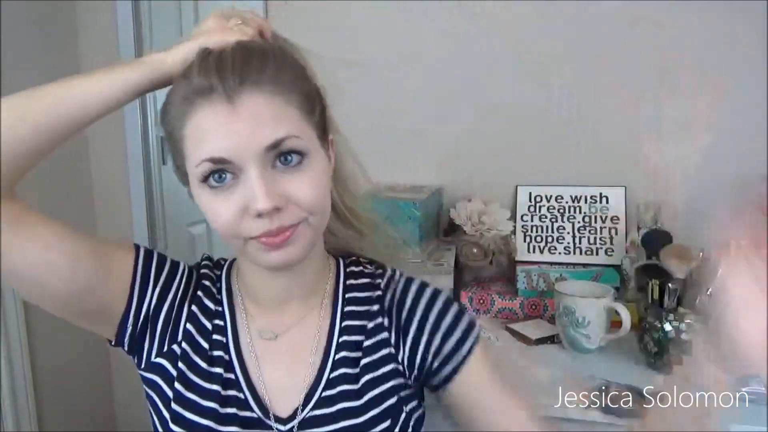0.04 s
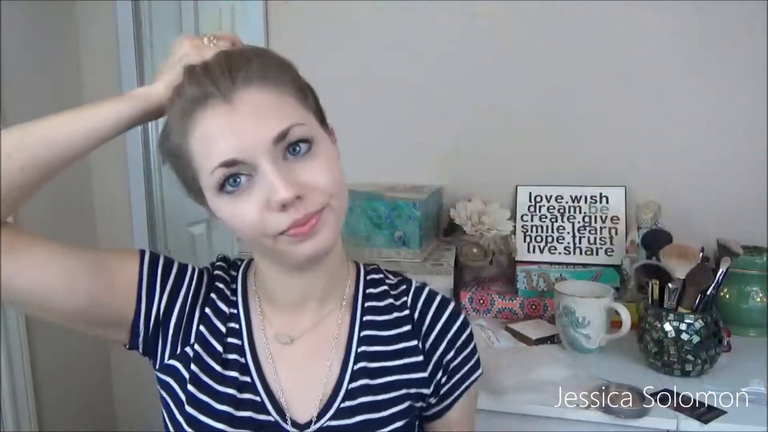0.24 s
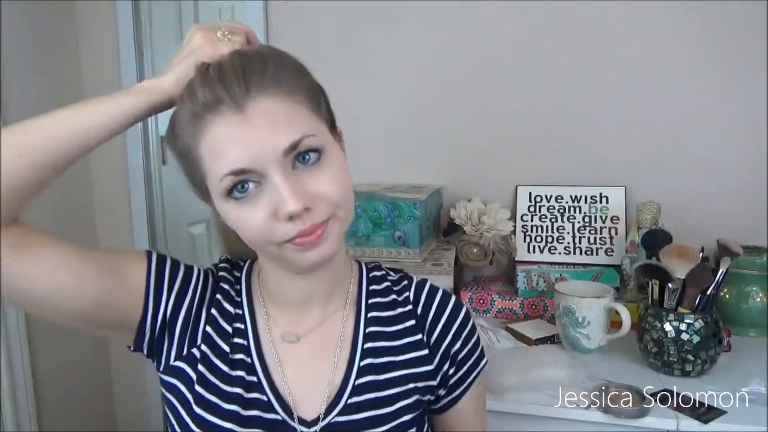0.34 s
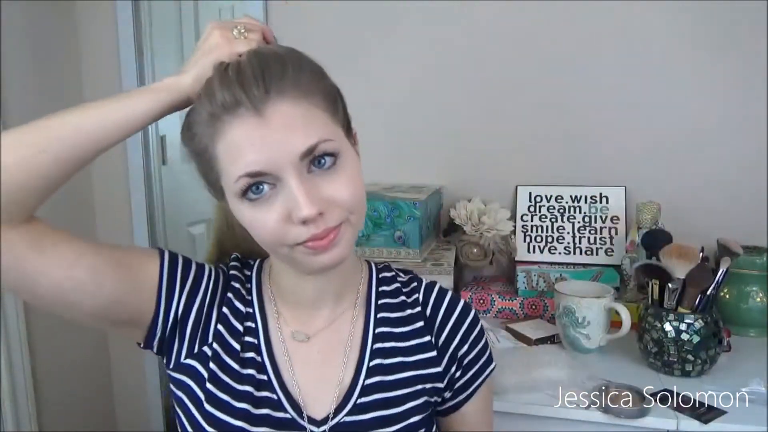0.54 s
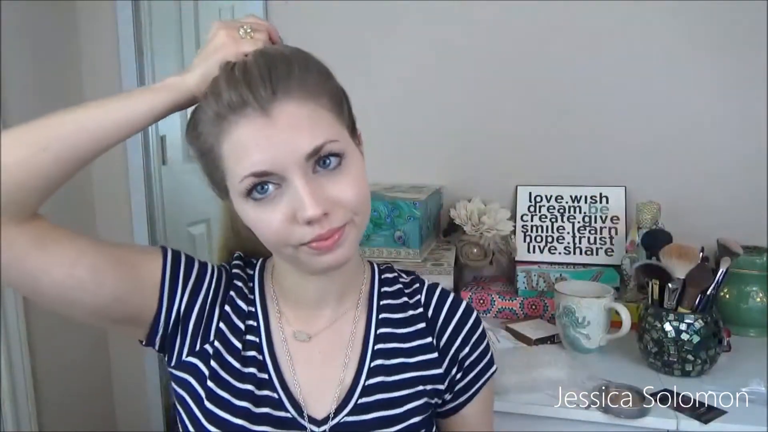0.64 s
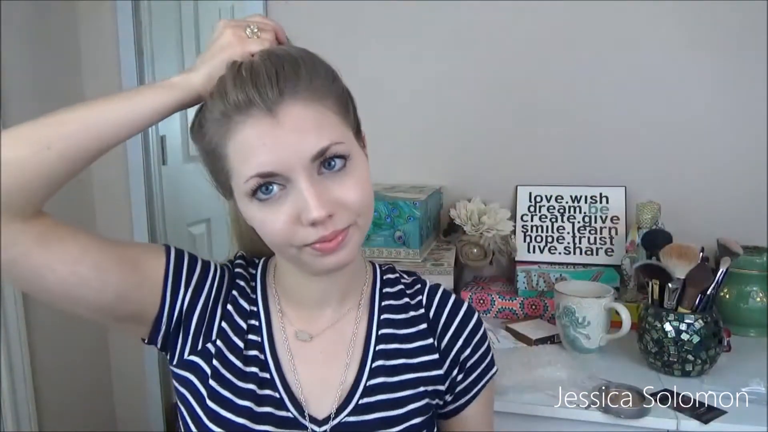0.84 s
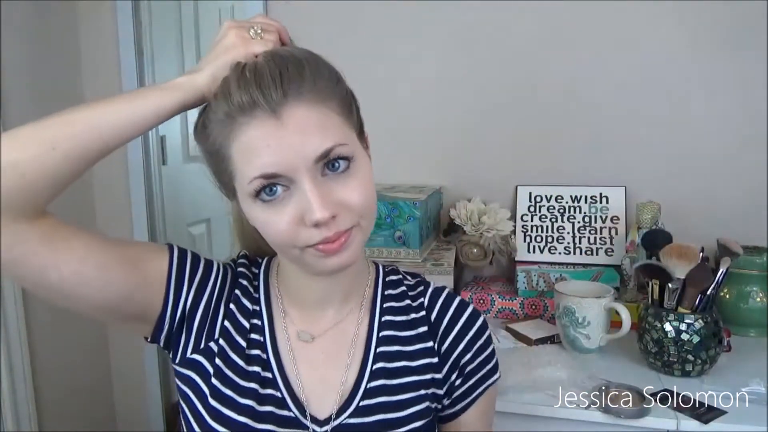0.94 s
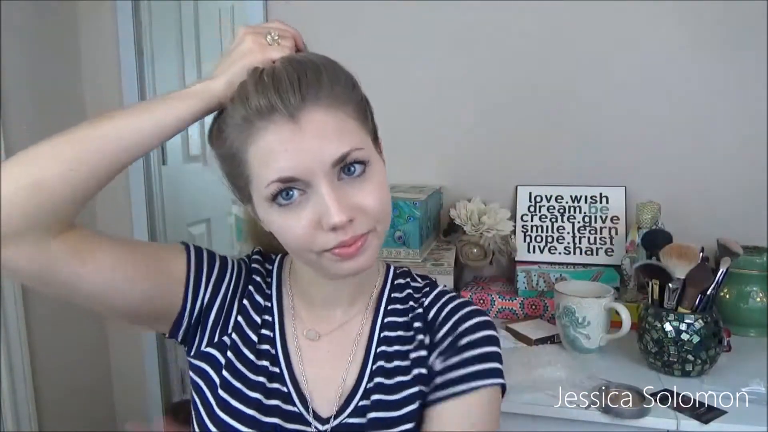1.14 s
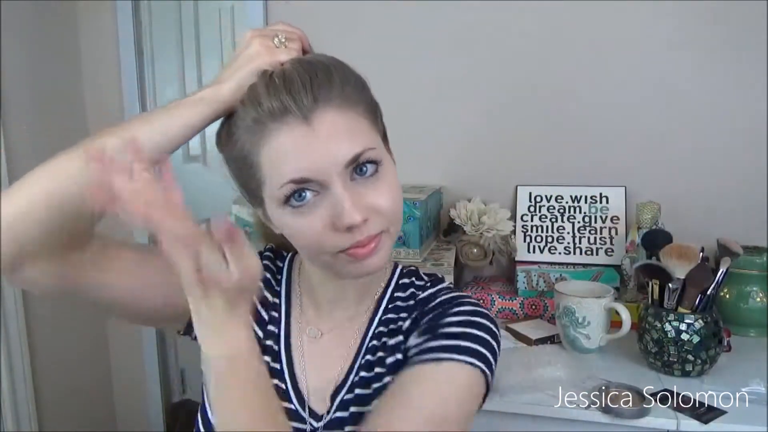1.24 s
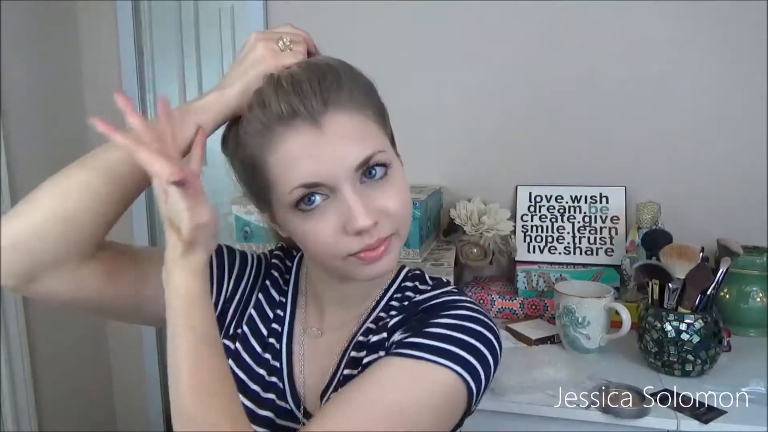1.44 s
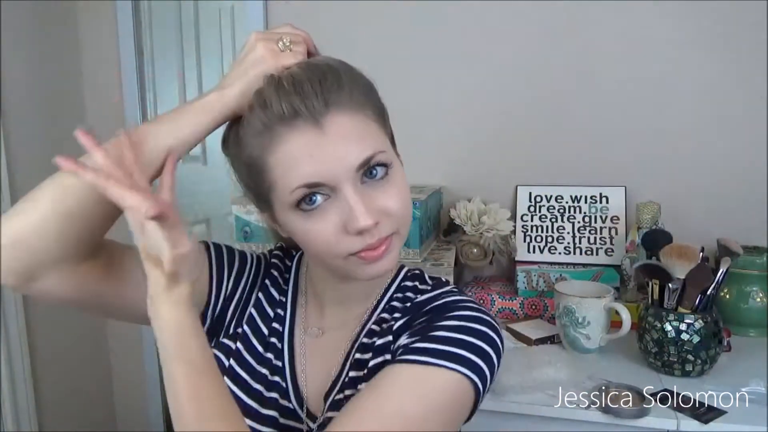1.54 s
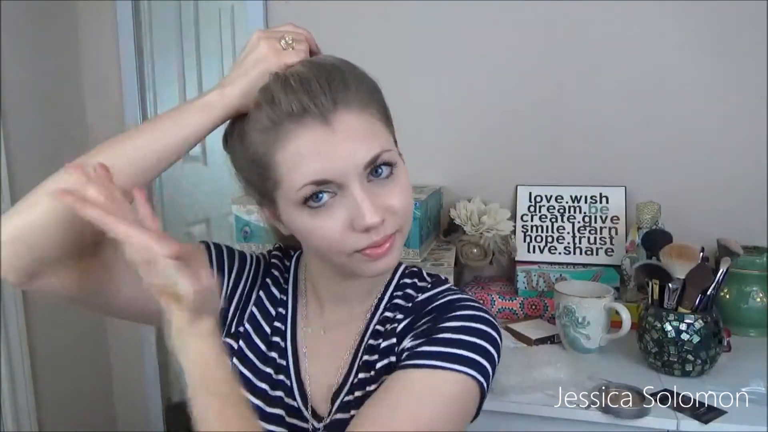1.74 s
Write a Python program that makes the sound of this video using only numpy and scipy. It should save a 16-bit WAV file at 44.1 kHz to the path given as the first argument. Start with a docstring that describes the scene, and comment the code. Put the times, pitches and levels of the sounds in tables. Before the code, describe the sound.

An elastic hair tie snaps once on a wrist at about 0.2 seconds, sharp and close, dying quickly in a small room. Much softer swishes of hair through a hand come at the start, around 0.3 to 0.5 seconds, most clearly near 1 second, then fade by 1.4. Faint, rapid, high electrical chirping, a low fan hum and room air continue underneath throughout.

```python
"""A soft swish of hair through a hand, then an elastic hair tie slips off the fingers and snaps on the wrist.
The snap is four quick blows that ring elastic and skin, over a dull push of flesh, in a small quiet room.
More swishes follow, grainy where the strands catch. Beneath: faint electrical chirping from a camera,
once per picture, plus room air, a fan hum and a brief low tone."""
import sys
import numpy as np
from scipy import signal
from scipy.fft import rfft, irfft
from scipy.io import wavfile

SR = 44100
rng = np.random.default_rng(int(sys.argv[2]) if len(sys.argv) > 2 else 0)


def master(y):
    """Save y as 16-bit WAV."""
    cut = np.clip(np.atleast_2d(y).T, -1, 1)
    pcm = np.round(cut * 32767)  # scale
    wavfile.write(sys.argv[1], SR, pcm.astype(np.int16))


N = 79380

# elastic landing (time [s], level [dB], contact time [s], direction [1 strikes, -1 springs away])
BLOWS = [(0.2069, -28, .00015, -1), (0.2082, -21, .00006, 1), (0.2087, -20, .00012, 1),
         (0.2098, -22, .00003, -1)]
# modes of elastic and skin (frequency [Hz], gain [dB], t60 [s])
RING_MODES = [(232, -21, 0.0089), (427, -25, 0.012), (688, -10.5, 0.018), (1484, -2.5, 0.0089),
              (2080, -17, 0.0065), (2910, -4, 0.0049), (3380, -6.5, 0.0052), (3850, -7, 0.0057),
              (5000, -6.5, 0.0035), (8500, -3.5, 0.0039), (9280, -5, 0.0049)]
# desk and near wall (delay [s], gain [dB])
ECHOES = [(.0046, -5.5), (.0058, -4.5)]
# room decay (frequency [Hz], t60 [s])
ROOM_T60 = [(130, 0.37), (400, 0.26), (1040, 0.25), (2760, 0.25), (7280, 0.2055)]
# hand along hair (peak time [s], rise sigma [s], fall sigma [s], hiss [dB], body [dB])
STROKES = [(0.04, 0.13, 0.27, -66.5, -72), (0.295, 0.039, 0.067, -60.5, -75),
           (0.465, 0.033, 0.027, -68.5, -70), (0.955, 0.016, 0.028, -54.5, -64.5),
           (0.985, 0.016, 0.02, -57, -60.5), (1.16, 0.056, 0.064, -66, -63.5), (1.27, .05, 0.1, -71.5, -76)]
# course of the chirping (time [s], pitch [Hz], chirp level [dB], tick level [dB])
CHIRP_TRACK = [(0.0, 2700, -61, -66), (0.131, 2636, -61.5, -91), (0.2, 2590, -65, -55),
               (0.289, 3370, -64.5, -60), (0.5, 3270, -68, -60), (0.93, 3374, -69.5, -64.5),
               (0.999, 2470, -64, -68), (1.19, 2415, -66.5, -71), (1.26, 2663, -62.5, -73),
               (1.63, 2632, -61, -80), (1.7, 2690, -69, -72), (1.76, 2690, -64, -66)]
# fan partials (frequency [Hz], rms level [dB])
FAN_PARTIALS = [(102.3, -72.5), (242.2, -82.5), (436.0, -82), (936.7, -83.5)]
# noise spectra (frequency [Hz], relative level [dB])
CRACK_SPECTRUM = [(300, -30), (1000, 2), (2500, 10), (4500, 1.5), (7000, -7), (9000, 0.5), (11500, -20)]
SLIP_SPECTRUM = [(100, 13), (400, -11), (1400, 8.5), (2500, 0), (5000, -8), (7000, -2), (9500, 9),
                 (11500, -26)]
ROOM_SPECTRUM = [(50, -26), (125, -3), (200, -1.5), (310, 2), (620, 3.5), (800, -3.5), (1100, 1), (1520, 0),
                 (2200, -6.5), (3500, -4), (4300, -8.5), (6300, -14.5), (8000, -13), (9500, -10.5),
                 (11000, -20.5)]
HAIR_HISS_SPECTRUM = [(1000, -35), (3500, -18), (4400, -8.5), (5700, -6.5), (7200, -7), (8400, -0.5),
                      (9500, 0.5), (10200, 0), (11200, -10)]
HAIR_BODY_SPECTRUM = [(300, -33), (1200, -5.5), (2300, 1), (3300, 0), (4500, -2), (6000, -5), (8000, -7),
                      (11000, -8.5)]
AIR_SPECTRUM = [(15, -40), (25, -12), (54, -6), (75, -14), (107, -4), (187, -11.5), (235, -8), (274, -11.5),
                (433, -11.5), (559, -13.5), (954, -12), (2100, -18.5), (2640, -18.5), (2930, -19.5),
                (11000, -27.5), (14300, -63), (22000, -120)]
# stereo likeness of the noises (frequency [Hz], left-right coherence [0..1])
ROOM_COHERENCE = [(60, 0.54), (220, 1), (820, 0.79), (3030, 0.72), (11200, 0.59)]
HAIR_COHERENCE = [(60, 0.95), (340, 0.36), (1960, 0.63), (11200, 0.85)]
AIR_COHERENCE = [(60, 0.99), (170, 0.88), (490, 0.16), (1380, 0.069), (3940, 0.37), (11200, 0.88)]

TIME_S, BINS_HZ = np.arange(N) / SR, np.fft.rfftfreq(N, 1 / SR)


def snap(crack_rel_db=-9, crack_decay_s=.0014, push_at_s=.2087, push_width_s=.000535):
    """Each blow rings elastic and skin and adds a rough crack; the flesh gives one dull push."""
    t = TIME_S[:2048]
    ring = sum(amp(db - 60 * t / t60_s) * np.sin(2 * np.pi * hz * t) for hz, db, t60_s in RING_MODES)
    force, crack_level = np.zeros(N), np.zeros(N)
    for at_s, db, contact_s, direction in BLOWS:
        pulse = decay(at_s, contact_s)
        force += direction * amp(db) * pulse / (pulse.sum() + 1e-12)
        crack_level += amp(db + crack_rel_db) * decay(at_s, crack_decay_s)
    crack = crack_level * noise(CRACK_SPECTRUM, ROOM_COHERENCE)
    ringing = signal.fftconvolve(force, ring)[:N]
    u = (TIME_S - push_at_s) / push_width_s
    push = amp(-33.5) * (1 - u ** 2) * bell(u)
    return crack - ringing - push


def slip():
    """The elastic rubs briefly as it leaves the finger."""
    return amp(-38) * decay(at_s=.2007, tau_s=.0053) * noise(SLIP_SPECTRUM, ROOM_COHERENCE)


def room(source, onset_s=.2095, rise_s=.0015):
    """Two bright echoes of the source, plus a noise wash that dies at each band's own rate."""
    hz, t, bands = signal.stft(noise(ROOM_SPECTRUM, ROOM_COHERENCE), SR, nperseg=256)
    fade = amp(-60 * np.maximum(t - onset_s, 0) / lookup(ROOM_T60, hz)[:, None])
    wash = signal.istft(bands * fade, SR, nperseg=256)[1][:, :N]
    wash *= 1 - np.exp(-since(onset_s) / rise_s)
    bright = highpass(source, edge_hz=5900)
    echoes = sum(amp(db) * np.roll(bright, round(delay_s * SR), axis=1) for delay_s, db in ECHOES)
    return amp(-35) * wash + echoes


def hair(grain_db=1.5, grain_s=.0029):
    """Each stroke swells and fades; catching strands make it grainy."""
    hiss_power, body_power = np.zeros(N), np.zeros(N)
    for peak_s, rise_s, fall_s, hiss_db, body_db in STROKES:
        swell = bell((TIME_S - peak_s) / np.where(TIME_S < peak_s, rise_s, fall_s))
        hiss_power += (amp(hiss_db) * swell) ** 2
        body_power += (amp(body_db) * swell) ** 2
    hiss = np.sqrt(hiss_power) * noise(HAIR_HISS_SPECTRUM, HAIR_COHERENCE)
    body = np.sqrt(body_power) * noise(HAIR_BODY_SPECTRUM, HAIR_COHERENCE)
    grain = amp(grain_db * drift(grain_s))
    return pan((hiss + body) * grain, right_db=.35)


def camera_chirps(rate_hz=30, first_s=.032, width_s=.0041, scatter_hz=30, scatter_db=.5):
    """Camera electronics: per picture, a tick and a tiny chirp that falls onto its pitch."""
    drop_hz, drop_lead_s, drop_s = 1403, .005025, .00053
    tick_hz, tick_lead_s, tick_width_s = 2650, .003, .00073
    out = np.zeros(N)
    track_s, *columns = np.transpose(CHIRP_TRACK)
    draws = rng.standard_normal((round(N / SR * rate_hz), 4))
    for k, (detune, phase, chirp_jitter, tick_jitter) in enumerate(draws):
        at_s = first_s + k / rate_hz
        pitch_hz, chirp_db, tick_db = (np.interp(at_s, track_s, column) for column in columns)
        near = abs(TIME_S - at_s) < .5 / rate_hz
        t = TIME_S[near] - at_s
        hz = pitch_hz + scatter_hz * detune + drop_hz / (1 + np.exp((t + drop_lead_s) / drop_s))
        chirp_level = amp(chirp_db + scatter_db * chirp_jitter) * bell(t / width_s)
        tick_level = amp(tick_db + scatter_db * tick_jitter) * bell((t + tick_lead_s) / tick_width_s)
        out[near] += chirp_level * np.sin(2 * np.pi * (np.cumsum(hz) / SR + phase))
        out[near] += tick_level * np.sin(2 * np.pi * (tick_hz * t - phase))
    return out


def fan_hum(waver=.21, waver_s=.077):
    """Fan partials, each wavering in level and phase."""
    hum = np.zeros(N)
    for hz, db in FAN_PARTIALS:
        level = amp(db) * np.sqrt(2) * (1 + waver * drift(waver_s))
        phase_rad = 2 * np.pi * (hz * TIME_S + rng.random()) + waver * drift(waver_s)
        hum += level * np.sin(phase_rad)
    return hum


def low_tone(hz=151, peak_s=.44, width_s=.19, waver_s=.077):
    """A low tone swells briefly after the snap."""
    level = amp(-70) * bell((TIME_S - peak_s) / width_s)
    return level * np.sin(2 * np.pi * hz * TIME_S + drift(waver_s) / 2)


def room_air():
    """Steady, bass-heavy air noise."""
    return amp(-63.5) * noise(AIR_SPECTRUM, AIR_COHERENCE)


def amp(db):
    """Decibels to gain."""
    return 10 ** (np.asarray(db) / 20)


def unit_rms(x):
    """Scales to rms 1."""
    return x / np.sqrt(np.mean(x ** 2) + 1e-20)


def lookup(table, hz):
    """Interpolates on a log-frequency axis."""
    table_hz, values = np.transpose(table)
    return np.interp(np.log(hz + 1), np.log(table_hz + 1), values)


def drift(scale_s):
    """Smooth random motion, rms 1."""
    return unit_rms(irfft(rfft(rng.standard_normal(N)) * np.exp(-(BINS_HZ * scale_s) ** 2), N))


def noise(spectrum, coherence):
    """Coloured stereo noise, rms 1."""
    mid, side = rfft(rng.standard_normal((2, N)))
    likeness = np.clip(lookup(coherence, BINS_HZ), 0, .995)
    mid, side = mid * np.sqrt(1 + likeness), side * np.sqrt(1 - likeness)
    return unit_rms(irfft(np.array([mid + side, mid - side]) * amp(lookup(spectrum, BINS_HZ)), N))


def since(at_s):
    """Seconds since onset, zero before."""
    return np.maximum(TIME_S - at_s, 0)


def decay(at_s, tau_s):
    """Exponential fall from onset, zero before."""
    return (TIME_S > at_s) * np.exp(-since(at_s) / tau_s)


def bell(u):
    """Gaussian, peak 1, sigma 1."""
    return np.exp(-u ** 2 / 2)


def highpass(x, edge_hz):
    """Second-order bass cut."""
    return signal.sosfilt(signal.butter(2, edge_hz, "high", fs=SR, output="sos"), x)


def pan(x, right_db):
    """Raises the right, lowers the left equally."""
    return x * amp([[-right_db], [right_db]])


def scene():
    """The snap, slightly right, in its room, over hair and background."""
    tie = highpass(snap() + slip(), edge_hz=138)  # a small source radiates little bass
    tie = pan(tie, right_db=.5)
    return tie + room(tie) + hair() + camera_chirps() + fan_hum() + low_tone() + room_air()


def record(dry):
    """Low-pass at 11.2 kHz."""
    taps = signal.firwin(401, 11200, window=("kaiser", 7), fs=SR)
    return signal.oaconvolve(dry, taps[None], "same")


dry = scene()
out = record(dry)
master(out)
```